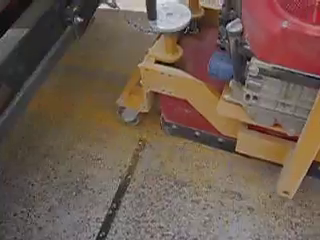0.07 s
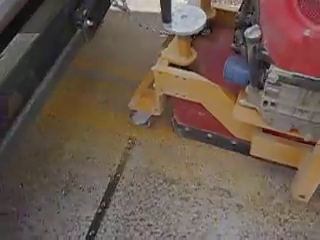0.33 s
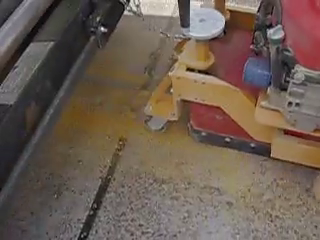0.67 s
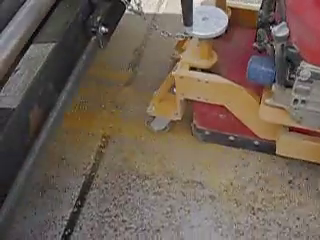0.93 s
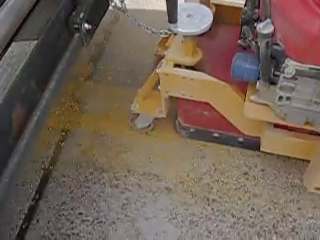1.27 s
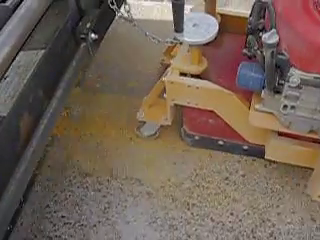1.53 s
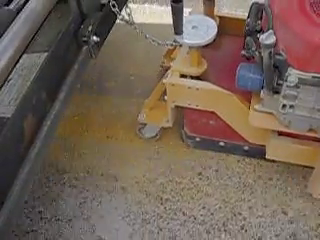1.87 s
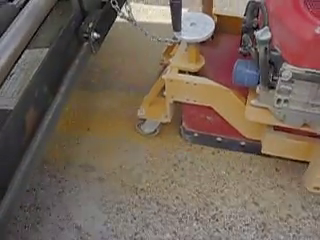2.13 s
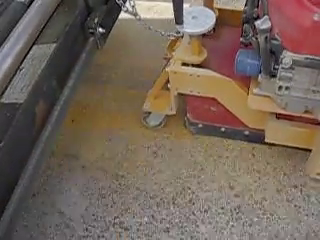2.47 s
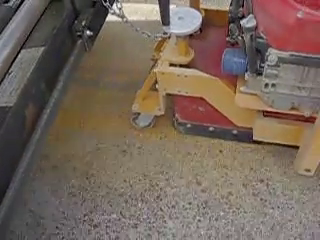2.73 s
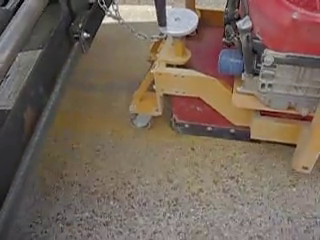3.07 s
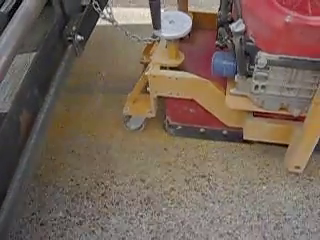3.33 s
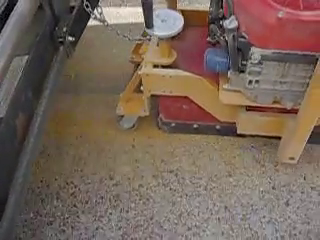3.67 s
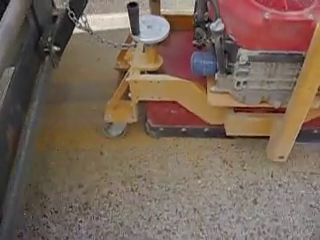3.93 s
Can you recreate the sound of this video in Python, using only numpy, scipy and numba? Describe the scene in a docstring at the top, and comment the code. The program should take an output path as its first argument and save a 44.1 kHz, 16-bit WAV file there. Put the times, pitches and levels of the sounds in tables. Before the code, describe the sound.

Close by outdoors, a pavement grinder roars continuously over its throbbing engine. Steel cutters ring against stone under a shuddering drone, and a brief moan swells near the end. The overloaded microphone adds distortion and irregular ticks.

```python
"""On a pavement outdoors, close by, a petrol-driven grinder strips paint.
Over the hum of a one-cylinder engine and the spindle, its cutters rain blows on the stone.
Grit hisses, and the impacts excite resonances: the housing roars, the steel cutters ring
and the guard drones. An overloaded narrow-band recorder squashes the roar and adds ticks."""
import sys
import numpy as np
from scipy import signal
from scipy.fft import rfft, irfft
from scipy.io import wavfile
from scipy.ndimage import uniform_filter1d
from numba import njit

SR = 44100
rng = np.random.default_rng(int(sys.argv[2]) if len(sys.argv) > 2 else 0)


def wrap_up_sound(samples):
    """Save the sound to the file named by the first command line argument, as 16-bit audio."""
    columns = np.atleast_2d(samples).T
    # keep every value between -1 and 1, then stretch to whole-number steps
    tamed = np.clip(columns, -1, 1)
    steps = np.round(tamed * 32767).astype(np.int16)
    wavfile.write(sys.argv[1], SR, steps)


N = 176400


def from_db(db):
    """Amplitude ratio of a level in decibels."""
    return 10 ** (np.asarray(db) / 20)


def rms_one(x):
    """Normalisation to unit rms."""
    return x / np.sqrt(np.mean(x ** 2) + 1e-20)


def in_time(rows):
    """Linear interpolation, sample by sample, of each column after t/s."""
    times, *columns = np.transpose(rows)
    return [np.interp(np.arange(N) / SR, times, column) for column in columns]


def phase_of(hz):
    """Phase in radians is the time integral of angular frequency."""
    return 2 * np.pi * np.cumsum(hz) / SR


def drift(corner_hz):
    """Low-pass filtered noise: a random wander of unit rms."""
    step, settle = 40, 2000  # computed at every 40th sample, start-up transient dropped
    pole = np.exp(-2 * np.pi * step * corner_hz / SR)
    noise = rng.standard_normal(N // step + settle + 2)
    slow = signal.lfilter([1], [1, -2 * pole, pole * pole], noise)[settle:]
    return np.interp(np.arange(N) / step, np.arange(len(slow)), rms_one(slow))


@njit
def moving_resonance(x, angle, r):
    """Damped oscillator: a two-pole band-pass of pole radius r, centred on angle (rad/sample)."""
    y = np.zeros(len(x))
    for i in range(2, len(x)):
        drive = (1 - r * r) / 2 * (x[i] - x[i - 2])
        y[i] = drive + 2 * r * np.cos(angle[i]) * y[i - 1] - r * r * y[i - 2]
    return y


def struck_mode(blows, hz, width_hz):
    """Impact excitation of two like resonators in cascade, each width_hz wide; unit rms."""
    kicks = blows * rng.standard_normal(N)  # each mode feels a blow with its own strength and sign
    angle = 2 * np.pi * hz / SR * np.ones(N)
    radius = np.exp(-np.pi * width_hz / SR)
    once = moving_resonance(kicks, angle, radius)
    return rms_one(moving_resonance(once, angle, radius))


def harmonics(phase, orders, waver_db):
    """Fourier series of a periodic motion, each partial wavering slowly in level."""
    out = 0
    for order, db in orders:
        amplitude = np.sqrt(2) * from_db(db + waver_db * drift(2))
        out = out + amplitude * np.sin(order * phase + rng.uniform(0, 2 * np.pi))
    return out


def overload_ticks():
    """Impulse responses of band-passes: tiny cracks, dull or bright, spill above the recorder's band."""
    # overload ticks: t/s, impulse level/dB, upper edge f/Hz
    ticks = [(0.053, -28, 9500), (0.058, -22.5, 5600), (0.09, -30, 11000), (0.286, -42, 15500),
             (0.342, -26, 6000), (0.402, -18, 6000), (0.409, -24, 13000), (0.554, -21, 9500),
             (0.596, -26, 9500), (0.737, -37, 15500), (0.871, -18, 8000), (0.882, -32, 13000),
             (0.935, -32, 13000), (0.943, -23, 5600), (0.965, -36, 11000), (1.033, -33, 11000),
             (1.118, -27, 9500), (1.252, -23.5, 11000), (1.364, -43, 13000), (1.368, -27, 13000),
             (1.51, -17.5, 8000), (1.561, -13, 6000), (1.611, -35, 11000), (1.625, -23, 9500),
             (1.722, -21, 11000), (2.059, -26, 11000), (2.105, -21, 9500), (2.139, -28, 13000),
             (2.144, -20, 8000), (2.203, -36, 13000), (2.501, -29, 11000), (2.555, -29, 8000),
             (2.596, -15, 8000), (2.598, -19, 8000), (2.771, -23, 9500), (2.775, -15, 5200),
             (2.796, -26, 7000), (2.842, -23, 9500), (2.97, -20, 9500), (3.197, -19.5, 8000),
             (3.292, -22, 9500), (3.441, -19, 8000), (3.527, -36.5, 11000), (3.531, -27, 11000),
             (3.688, -23, 11000), (3.934, -25, 9500), (3.959, -39.5, 13000)]
    low_hz = 3800
    out = np.zeros(N + SR)
    for t, db, top_hz in ticks:
        band = signal.butter(2, [low_hz, top_hz], "band", fs=SR, output="sos")
        tick = signal.sosfilt(band, signal.unit_impulse(256))
        start = int(t * SR)
        out[start:start + len(tick)] += from_db(db) * tick
    return out[:N]


def engine(phase):
    """Periodic firing of one cylinder radiates harmonics of the firing rate."""
    # engine partials: harmonic number, level/dB
    orders = [(2, -50), (3, -43.5), (5, -37.5), (8, -39), (11, -33.5), (12, -33.5), (13, -28.5), (30, -33)]
    return harmonics(phase, orders, waver_db=1.5)


def spindle(phase):
    """Periodic rotation of the cutter spindle hums at multiples of its rate."""
    # spindle partials: harmonic number, level/dB
    orders = [(1, -51.5), (4, -28), (5, -43)]
    return harmonics(phase, orders, waver_db=4.5)


def grit(force):
    """Amplitude-modulated noise: a broadband gritty hiss, each third-octave band flickering."""
    # spectrum of the grit: f/Hz, relative spectral density level/dB
    spectrum = [(20, -19.5), (45, -13.5), (100, -8), (170, -0.5), (300, -4.5), (500, -5.5), (850, -1.5),
                (1150, 0), (1800, -6), (2400, -2.5), (3200, -6), (3700, -11), (4400, -6)]
    points_hz, points_db = np.transpose(spectrum)
    edges_hz = 18 * 2 ** (np.arange(26) / 3)
    white = rng.standard_normal((2, N)) * force  # two noises keep adjacent bands incoherent
    out = 0
    for k, (low, high) in enumerate(zip(edges_hz, edges_hz[1:])):
        band = signal.butter(2, [low, high], "band", fs=SR, output="sos")
        centre_hz = np.sqrt(low * high)
        band_db = np.interp(np.log(centre_hz), np.log(points_hz), points_db)
        # the treble edge of the narrow-band sound flutters more
        flicker_db = 3 * drift(77) if centre_hz > 3700 else drift(30)
        out = out + signal.sosfilt(band, white[k % 2]) * from_db(band_db + flicker_db)
    return from_db(-18) * rms_one(out)


def cutter_blows(force, per_s=6000, spread_db=2.5):
    """A Poisson process: the cutters hit the stone at random instants, with uneven strength."""
    struck = rng.random(N) < per_s / SR
    strength = from_db(spread_db * np.minimum(rng.exponential(1, N), 4))
    return force * struck * strength


def housing(blows):
    """Modal superposition: the housing's resonances add to a roar, and one swells into a moan."""
    # swell of the roar: t/s, relative level/dB
    swell = [(0.0, 0.9), (0.24, 0), (0.48, 0.6), (1.3, -1), (1.46, 1.7), (1.74, -1.6), (1.88, 1.7),
             (2.02, -1.0), (2.58, 0.7), (2.88, -0.7), (3.24, 1.7), (3.5, -0.2), (3.66, 1), (4.0, 1.2)]
    # modes of the housing: f/Hz, bandwidth per stage/Hz, level/dB
    modes = [(206.4, 55, -27), (244.3, 41, -29.5), (429.6, 110, -26), (566, 87, -26), (626, 80, -26.5),
             (686, 77, -25.5), (767.3, 73, -27), (937, 170, -29), (1370, 190, -34.5), (1585, 160, -36),
             (2497, 14, -40), (974, 16, -39.5), (3200, 130, -34.5)]
    # main resonance: t/s, f/Hz, level/dB
    main_mode = [(0, 658, -27), (.7, 619, -30.5), (1.3, 628, -35.5), (1.6, 614, -28), (1.85, 624, -35),
                 (2.1, 617, -27.5), (2.6, 631, -25.5), (2.85, 626, -35.5), (3.25, 622, -27.5),
                 (3.5, 592, -29), (3.68, 590, -17), (3.88, 614, -31), (4, 640, -28)]
    swell_db, = in_time(swell)
    roar = sum(from_db(db) * struck_mode(blows, hz, width) for hz, width, db in modes)
    moan_hz, moan_db = in_time(main_mode)
    moan = from_db(moan_db) * struck_mode(blows, moan_hz, width_hz=38)
    return from_db(swell_db) * roar + moan


def cutters(blows):
    """Free vibration after each impact: the steel rings with a sharp core in a broad cluster."""
    # ring of the cutters: t/s, f/Hz, relative level/dB
    ring = [(0.0, 2843, 3.5), (0.16, 2845, -1.8), (0.28, 2760, 2.5), (0.92, 2800, 0.5), (1.0, 2880, 0.5),
            (1.26, 2740, 1), (1.44, 2750, 4.5), (1.52, 2744, 1.7), (1.68, 2780, 3), (2.14, 2680, 0),
            (2.52, 2775, 1.3), (2.58, 2750, -1.5), (2.76, 2665, 1.5), (4.0, 2790, -0.0)]
    hz, db = in_time(ring)
    cluster = from_db(-25.5) * struck_mode(blows, hz, width_hz=490)
    core = from_db(-29.5) * struck_mode(blows, hz, width_hz=230)
    return from_db(db) * (cluster + core)


def guard(blows):
    """Forced vibration: chatter and blows make the guard drone, shuddering as the cutters bite."""
    # hollow drone of the guard: t/s, f/Hz, relative level/dB
    drone = [(0.0, 270, 3), (0.26, 303, -0.8), (0.42, 298.4, 2), (0.56, 298, -3.5), (0.62, 297, 2.5),
             (0.98, 302, 1.4), (1.04, 289.4, 8.3), (1.1, 304, -1), (1.26, 272.5, 6.5), (1.34, 278, 1.5),
             (1.74, 279, 3.2), (1.86, 299, -1.5), (1.96, 287.4, 2.5), (2.46, 285, -1), (2.68, 301, 1.7),
             (2.76, 269.6, -1.6), (3.06, 294, 2), (3.12, 293, -11), (3.24, 263, 3.5), (3.3, 301, -3),
             (3.56, 277, 2.5), (3.66, 288, -2), (3.92, 286, -3), (4.0, 276, 4)]
    jitter_hz, shudder_hz, wander_hz, shudder_depth = 13.99, 22.04, 5.94, .45
    hz, db = in_time(drone)
    chatter_phase = phase_of(hz + jitter_hz * drift(24.73))
    chatter = np.sqrt(2) * from_db(-21 + drift(50)) * np.sin(chatter_phase)
    shudder = 1 + shudder_depth * np.sin(phase_of(shudder_hz + wander_hz * drift(8)))
    ringing = from_db(-23) * struck_mode(blows, hz, width_hz=96.5)
    return from_db(db) * shudder * (chatter + ringing)


def scene():
    """Amplitude modulation: engine and spindle hum, and make the grinding force throb."""
    # firing rate of the engine: t/s, f/Hz
    firing = [(0, 26.7), (.6, 24.8), (1.1, 27), (1.6, 25.8), (2.05, 25.6), (2.6, 25.15), (3.3, 25.1),
              (4, 24.4)]
    firing_hz, = in_time(firing)
    spindle_hz = 67.14 * (1 + .006 * drift(2))
    engine_phase, spindle_phase = phase_of(firing_hz), phase_of(spindle_hz)
    force = from_db(0.51 * np.cos(engine_phase) + 0.5 * np.cos(spindle_phase))
    blows = cutter_blows(force)
    hum = engine(engine_phase) + spindle(spindle_phase)
    return (guard(blows) + cutters(blows) + housing(blows) + grit(force) + hum)[None]


def record(dry):
    """Compression, saturation and band limiting; then ticks, hiss, a top cut and a constant offset."""
    threshold_db, slope, window_s = -10.5, 0.73, .012
    saturation, makeup_db, offset = 0.73, 1, -.0875
    edge_hz, stop_hz, top_cut_hz = 3385, 4906, 15900
    power = uniform_filter1d(dry[0] ** 2, int(window_s * SR))
    excess_db = np.maximum(10 * np.log10(power + 1e-12) - threshold_db, 0)
    compressed = dry[0] * from_db(-slope * excess_db)
    squashed = from_db(makeup_db) * saturation * np.tanh(compressed / saturation)
    hz = np.fft.rfftfreq(2 * N, 1 / SR)
    transition = np.clip((hz - edge_hz) / (stop_hz - edge_hz), 0, 1)
    passband = np.cos(np.pi / 2 * transition) ** 4
    narrow = irfft(rfft(squashed, 2 * N) * passband)[:N]
    hiss = from_db(-95.5) * rng.standard_normal(N)
    top_cut = signal.ellip(10, .1, 80, top_cut_hz, fs=SR, output="sos")
    return signal.sosfilt(top_cut, narrow + overload_ticks() + hiss)[None] + offset


dry = scene()
out = record(dry)
wrap_up_sound(out)
```